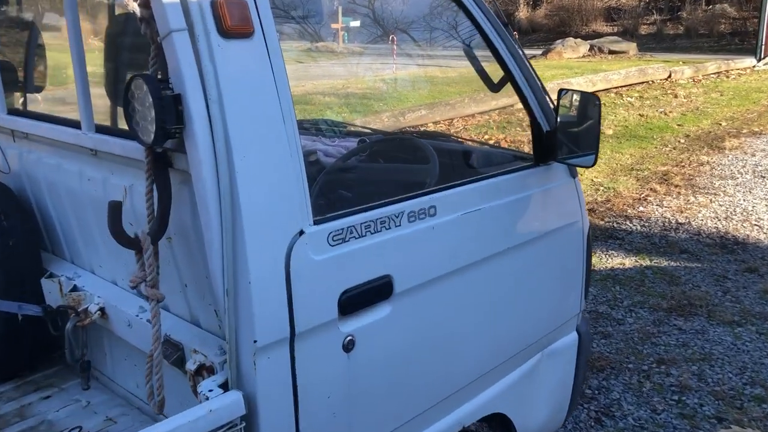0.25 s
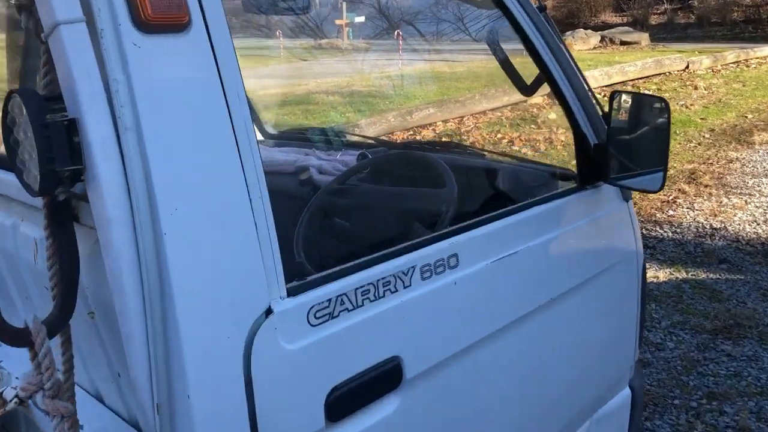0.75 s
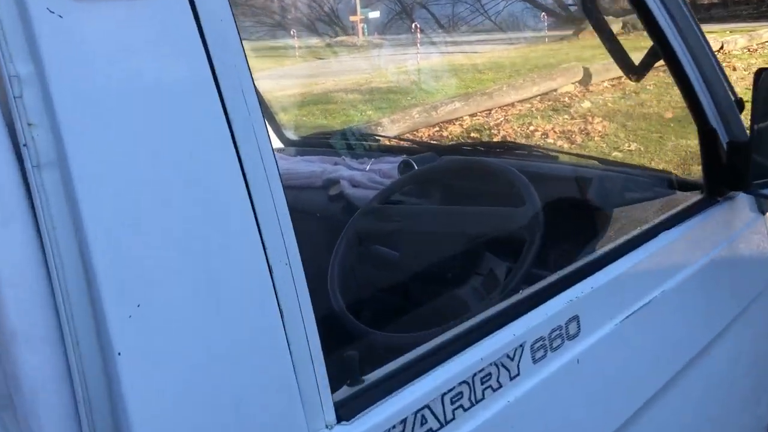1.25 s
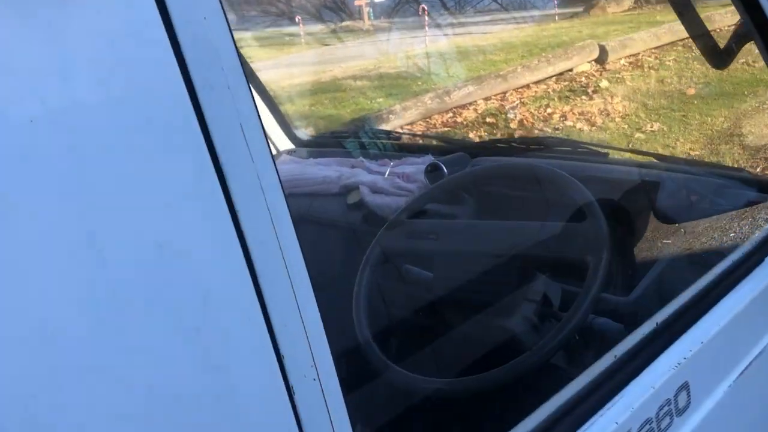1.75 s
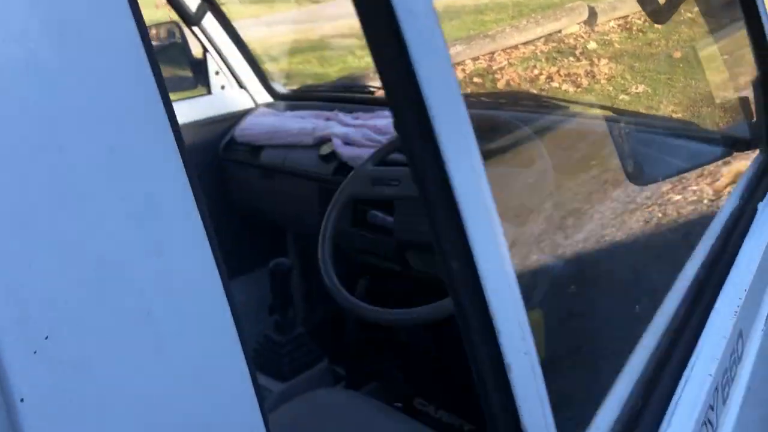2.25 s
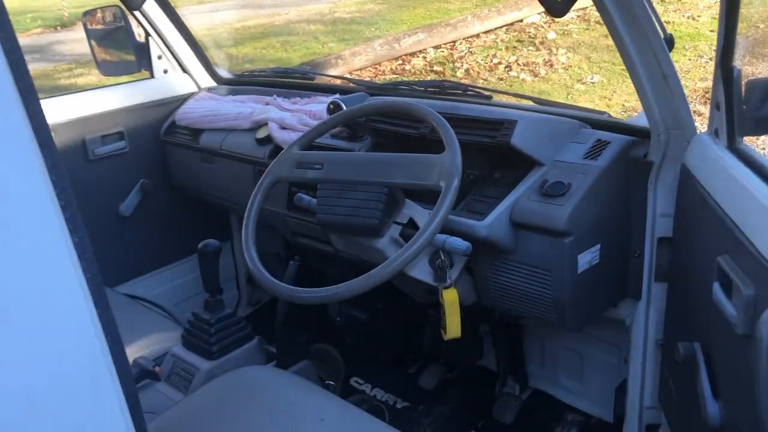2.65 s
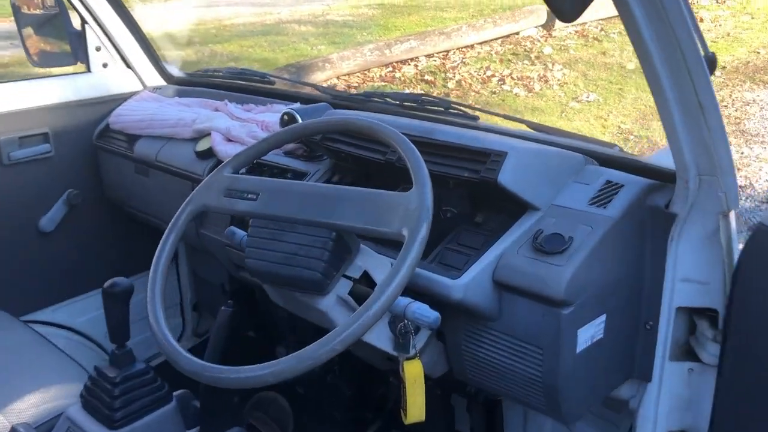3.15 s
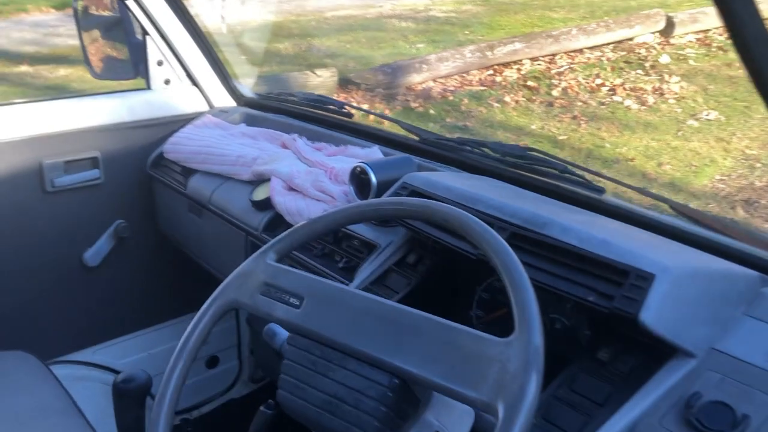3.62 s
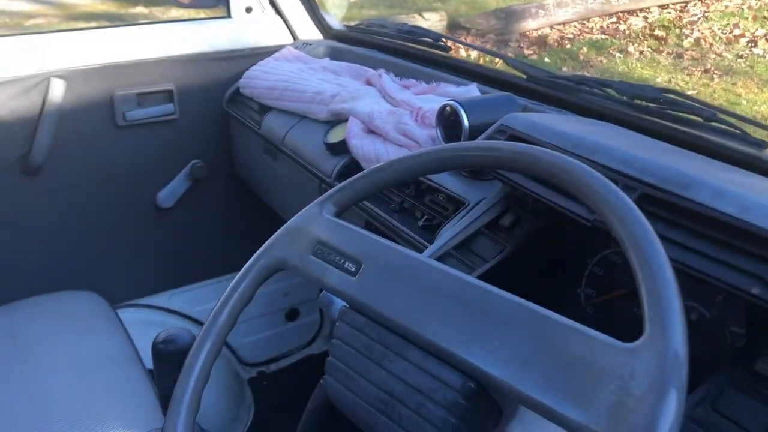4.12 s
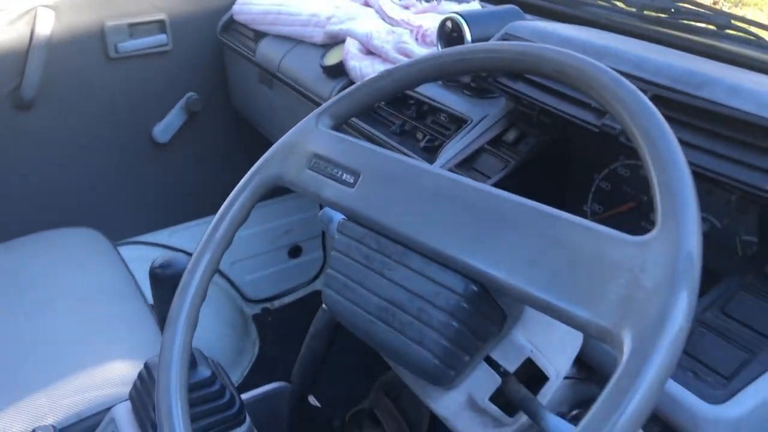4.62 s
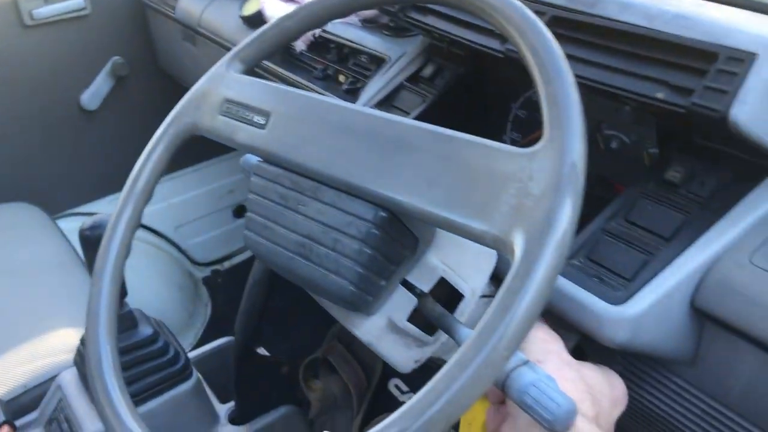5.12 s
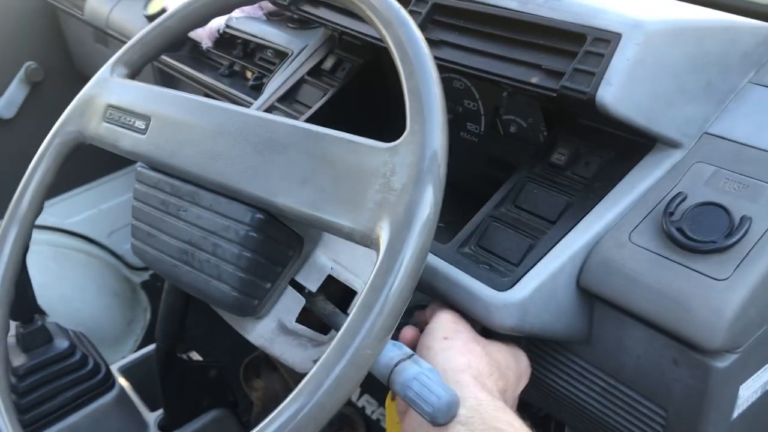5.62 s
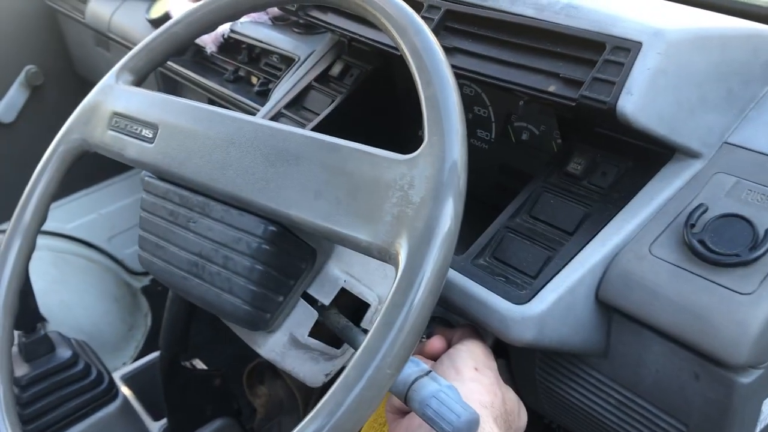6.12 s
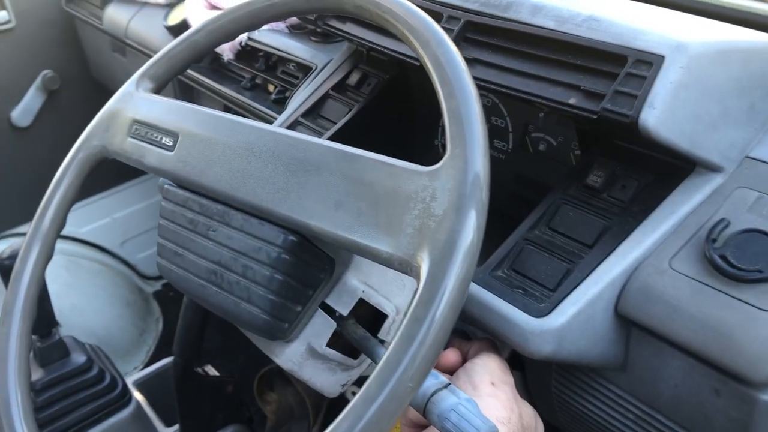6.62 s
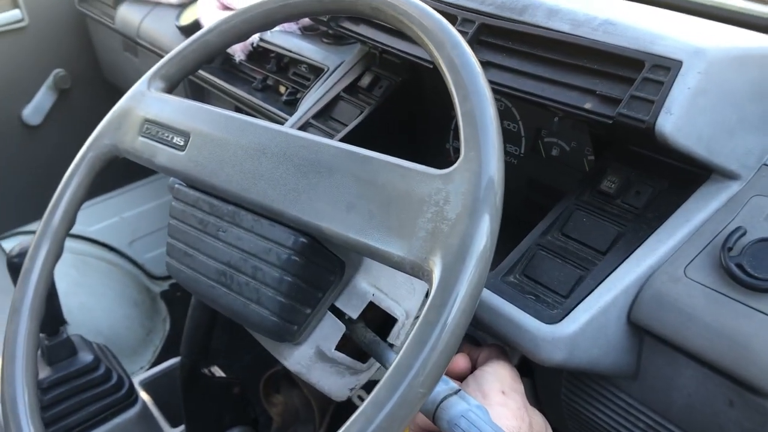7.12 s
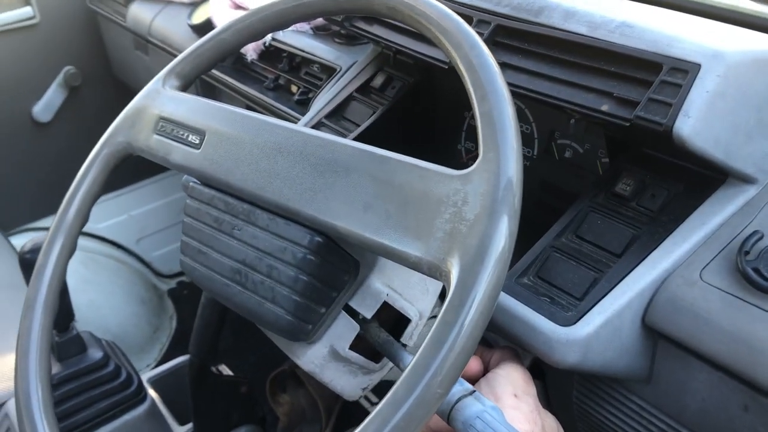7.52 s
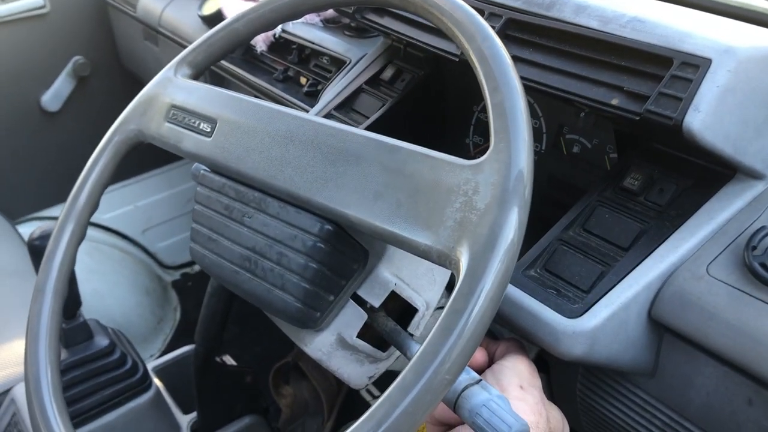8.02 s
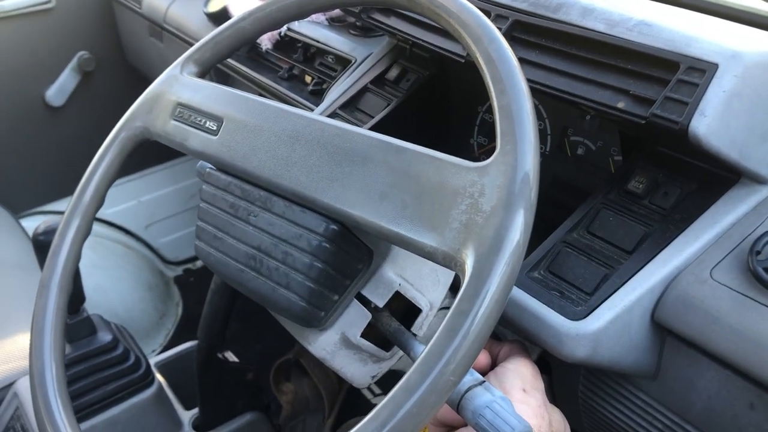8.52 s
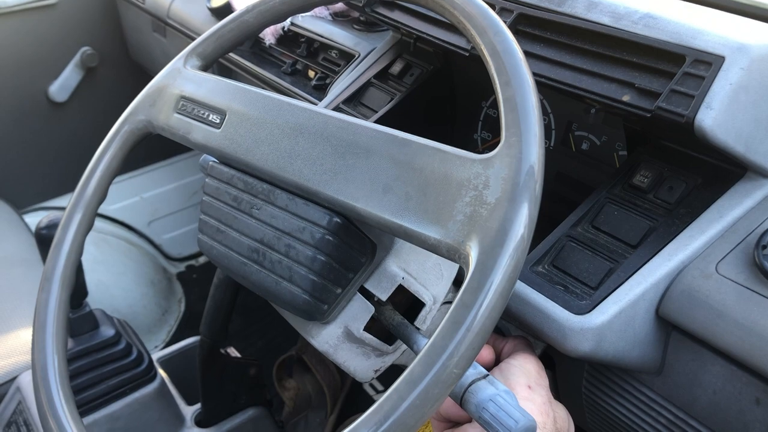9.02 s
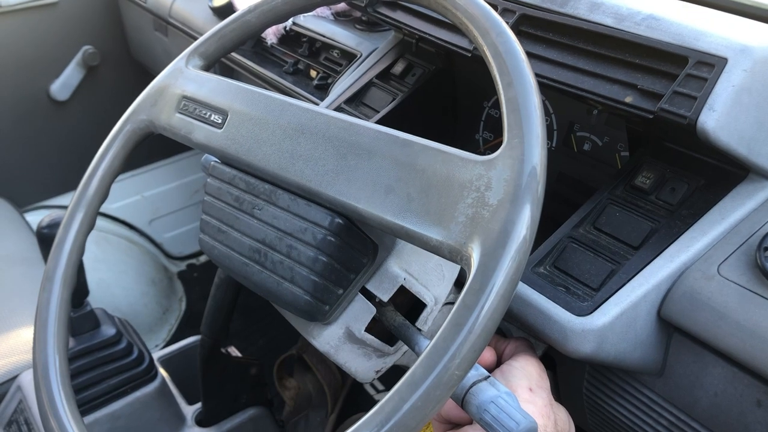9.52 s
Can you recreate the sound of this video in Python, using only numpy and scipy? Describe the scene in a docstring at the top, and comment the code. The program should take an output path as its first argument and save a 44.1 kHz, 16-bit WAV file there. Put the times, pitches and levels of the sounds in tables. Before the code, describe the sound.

Outdoors, shoes crunch over gravel, with a few distant dog barks at first. Close by, a steel truck door pops open loudly, followed by bumps in the cab and the click and clink of keys in the ignition. The starter motor turns the engine over in a quick run of whining, hissing chugs that shake the cab, then drags down to single weak turns without the engine firing.

```python
"""A truck that won't start

Someone crosses gravel to a small truck, pops the latch, swings the door open and leans in to turn the key.
The solenoid clacks and the starter drags the engine over its compressions, then slows to single laboured
heaves; it never fires. Gear whine, brush hiss and the shuddering block sound through the cab, over a
quiet yard with a far-off dog."""
import sys
import numpy as np
from scipy import signal
from scipy.fft import rfft, irfft
from scipy.io import wavfile
from scipy.ndimage import uniform_filter1d

SR = 44100
rng = np.random.default_rng(int(sys.argv[2]) if len(sys.argv) > 2 else 0)


def materialize(psi):
    """Save the field psi as 16-bit PCM at rate SR to the path in sys.argv[1].

    A 1-D psi becomes a single channel; in a 2-D psi each row is a channel.
    """
    bounded = np.clip(np.atleast_2d(psi).T, -1, 1)
    quanta = np.round(bounded * 32767).astype(np.int16)
    wavfile.write(sys.argv[1], SR, quanta)


N = 430416
T = np.arange(N) / SR
HIT_T = T[:SR // 2]

# shoes landing and rolling on gravel: start_s, crunch_db, length_s, heel_db
FOOTFALLS = [(0.461, -34.5, 0.16, -44), (0.49, -54, .1, -38), (0.508, -55, .1, -43),
             (0.521, -50, 0.12, -35), (0.586, -24, 0.027, -33), (0.662, -58, .07, -41.5),
             (1.052, -40.5, 0.14, -74), (1.098, -38.5, 0.52, -44.5), (1.157, -51, 0.071, -44),
             (1.196, -50, 0.067, -44), (1.245, -35, 0.083, -33.5), (1.43, -42.5, 0.061, -57),
             (1.591, -33, 0.31, -46), (1.604, -25.5, 0.081, -34.5), (1.636, -40, 0.062, -37.5),
             (1.761, -31.5, .03, -55), (1.782, -48, 0.073, -47), (1.822, -28, 0.091, -48),
             (2.282, -74, 0.057, -36.5), (3.071, -34, 0.49, -45), (3.23, -34.5, 0.1, -53),
             (3.533, -36, 0.11, -45.5), (3.559, -27.5, 0.16, -37), (3.632, -25.5, 0.11, -32.5),
             (3.76, -36.5, 0.35, -43), (3.88, -35, 0.33, -53), (4.066, -42.5, 0.51, -55)]
# modes of the cab trim: pitch_hz, level_db, t60_s
TRIM_MODES = [(575, 15.5, 0.19), (630, 11.5, 0.83), (689, -18, 0.28), (1134, -35, 0.19), (1680, 11, 0.12),
              (2121, -36, 0.2), (2277, -52, 0.11)]
# starter surges, one per compression plus a weak straining creep between the last two heaves:
# top_speed_s, mesh_hz, length_s, hiss_db, grind_db, shudder_db
SURGES = [(5.885, 372, 0.19, -53.5, -44, -34.5), (6.155, 406, 0.23, -45, -41, -38.5),
          (6.364, 406, 0.19, -44.5, -41.5, -38), (6.565, 409, .2, -44.5, -41.5, -39),
          (6.773, 407, 0.21, -45, -42, -37), (6.98, 378, 0.22, -46, -42, -41),
          (7.267, 345, .23, -47, -44, -40.5), (8.241, 275, 0.29, -49.5, -45.5, -39.5),
          (8.742, 139.5, 0.38, -78.5, -65.5, -42.5), (9.01, 284, .27, -49, -45.5, -38.5)]


def undb(db):
    return 10 ** (np.asarray(db) / 20)


def unit(x):
    return x / np.sqrt(np.mean(x ** 2))


def crest(x):
    """Scale so that the loudest 5 ms have rms 1."""
    return x / np.sqrt(uniform_filter1d(x ** 2, SR // 200).max())


def add(out, start_s, x):
    i = int(start_s * SR)
    out[i:i + len(x)] += x[:N - i]


def envelope(rows, steep=3):
    """Joint gain of swells (peak_s, level_db, rise_s, fall_s), each halved one rise or fall away."""
    swells = [undb(db) / (1 + np.abs((T - s) / np.where(T < s, rise, fall)) ** steep)
              for s, db, rise, fall in rows]
    return np.sqrt(sum(swell ** 2 for swell in swells))


def colour(x, outline, resonances=()):
    """EQ by a (freq_hz, level_db) outline with steep ends, lifted at each resonance; rms 1."""
    f = np.fft.rfftfreq(len(x), 1 / SR) + 1
    hz, db = np.transpose(outline)
    octaves_outside = np.maximum(np.log2(hz[0] / f), 0) + np.maximum(np.log2(f / hz[-1]), 0)
    gain = undb(np.interp(np.log(f), np.log(hz), db) - 20 * octaves_outside)
    for centre, width, lift_db in resonances:
        gain = gain * undb(lift_db / (1 + (2 * (f - centre) / width) ** 2))
    return unit(irfft(rfft(x) * gain, len(x)))


def noise(outline, resonances=(), n=N):
    return colour(rng.standard_normal(n), outline, resonances)


def wander(rate_hz):
    """Smooth random drift with rms 1."""
    hold = int(SR / rate_hz)
    stairs = np.repeat(rng.standard_normal(N // hold + 1), hold)
    return unit(uniform_filter1d(stairs, hold)[:N])


def fade(t60):
    return np.exp(-np.log(1000) * HIT_T / max(t60, .004))


def ring(modes):
    """Free decay of (pitch_hz, level_db, t60_s) modes."""
    return sum(undb(db) * fade(t60) * np.sin(2 * np.pi * hz * HIT_T) for hz, db, t60 in modes)


def scatter(x, t60, wet_db):
    """Add dense reflections off nearby surfaces."""
    tail = rng.standard_normal(len(HIT_T)) * fade(t60)
    return x + undb(wet_db) * signal.fftconvolve(x, tail / np.linalg.norm(tail))[:N]


def blows(hits, body_eq, body_db, thud_db, tick_db, thud_t60, tick_t60,
          modes=(), ring_db=0, top_db=0, contact_s=.004):
    """Bright contact ticks, panel clatter and slower low thuds; the dB settings trim each hit's levels."""
    thud_eq = [(80, -21.5), (130, -4.5), (220, -2), (380, -.5), (600, -5)]
    tick_eq = [(2200, -5.5), (3500, 2), (6000, -1), (11000, top_db / 2 - 4), (15500, top_db - 6)]
    out, n = np.zeros(N), len(HIT_T)
    for s, hit_body_db, hit_thud_db, hit_tick_db, t60, hz in hits:
        attack = 1 - fade(contact_s)
        clatter = crest(noise(body_eq, [(hz, hz / 8, 7)], n) * fade(t60)) + .5 * ring([(hz, 0, t60)])
        if modes:
            clatter += undb(ring_db) * crest(ring(modes) * fade(4 * t60))
        thud = noise(thud_eq, [(197, 54, 5.1)], n) * fade(thud_t60) * (1 - fade(.013))
        tick = noise(tick_eq, n=n) * fade(tick_t60)
        add(out, s, undb(hit_body_db + body_db) * crest(clatter * attack))
        add(out, s, undb(hit_thud_db + thud_db) * crest(thud))
        add(out, s, undb(hit_tick_db + tick_db) * crest(tick * attack))
    return out


def yard(outdoor_db=-57.5, cab_db=-62):
    """Open-air rumble gives way to the duller air of the cab."""
    # the air in the yard, and screened by the cab: freq_hz, level_db
    outdoor_eq = [(15, -34), (25, 8), (84, 5), (217, -7), (326, -8.5), (624, -9), (754, -8.5), (962, -9),
                  (1100, -9), (1520, -11), (1700, -14.5), (2480, -22.5), (4030, -27.5), (16000, -36.5)]
    cab_eq = [(15, -38), (25, 1.5), (53, 2), (87, -5), (200, -11), (270, -19.5), (335, -13.5), (439, -31),
              (503, -23.5), (1940, -30.5), (2410, -35), (16000, -43.5)]
    inside = np.interp(T, [3.4, 5], [0, 1])
    air = (1 - inside) * undb(outdoor_db) * noise(outdoor_eq) + inside * undb(cab_db) * noise(cab_eq)
    return air * undb(.32 * wander(1.6))


def dog():
    """Hoarse, distant yelps rise and fall in pitch, blurred by the trees."""
    # far-off barks: start_s, length_s, pitch_hz, level_db
    barks = [(0.021, 0.09, 754, -57.5), (0.282, 0.12, 755, -63.5), (0.47, 0.11, 766, -55),
             (0.734, 0.126, 765, -66), (0.902, 0.14, 775, -61)]
    out, n = np.zeros(N), len(HIT_T)
    for s, length, hz, db in barks:
        arch = np.sin(np.pi * np.minimum(HIT_T / length, 1))
        pitch = hz * (1 + .08 * (arch - 1) - .33 * fade(1.8 * length) + .022 * wander(200)[:n])
        phase = 2 * np.pi * np.cumsum(pitch) / SR
        voice = .7 * np.sin(phase) + np.sin(2 * phase) + .15 * np.sin(3 * phase)
        rasp = 1 + .45 * (1 + 3 * fade(2 * length)) * wander(350)[:n]
        add(out, s, undb(db) * arch * rasp * voice)
    return scatter(out, t60=.39, wet_db=-.5)


def gravel(count=18000, spread_db=2.5, ring_cycles=2.6, attack_s=.014):
    """Each crunch releases a shower of stone clicks, every one with its own pitch and size."""
    stone_eq = [(600, 8.5), (1500, 4), (3000, -5.5), (6000, -5), (10000, -1), (15500, -2.5)]
    pressure, stones = np.zeros((2, N))
    for s, db, length, _ in FOOTFALLS:
        add(pressure, s, undb(db) * fade(2 * length) * (1 - fade(attack_s)))
    when, pitch_rank, size_rank = rng.random((count, 3)).T
    hz = 700 * (15000 / 700) ** (pitch_rank ** .6)
    size = undb(spread_db * np.minimum(-np.log(1 - size_rank), 4)) * np.sqrt(hz)
    cycles = hz[:, None] * HIT_T[:SR // 150]
    clicks = size[:, None] * np.exp(-cycles / ring_cycles) * np.sin(2 * np.pi * cycles)
    for s, click in zip(when * T[-1] / 2, clicks):
        add(stones, s, click)
    slips = undb(2.5 * wander(90))  # the stones give way unevenly
    return undb(-17.5) * colour(stones, stone_eq) * pressure * slips


def heels(pitch_hz=719.6, t60=.125):
    """Every heel lands with the same short knock, and a tick that follows its crunch in level."""
    hits = [(s, db, db, crunch_db, t60, pitch_hz) for s, crunch_db, _, db in FOOTFALLS]
    return blows(hits, [(300, 6), (750, -1.5), (1200, -2.5), (2400, -22)], body_db=-8.5, thud_db=-16,
                 tick_db=-21.5, thud_t60=.3, tick_t60=.028, top_db=20, contact_s=.0099)


def cab_knocks(rap_t60=.013):
    """The cab knocks and creaks as the driver leans in; each knock opens with a short rap."""
    # bumps against the cab: start_s, body_db, tick_db, t60_s, pitch_hz
    knocks = [(1.788, -30.5, -48.5, 0.11, 1990), (2.309, -35, -59.5, 0.034, 500),
              (2.466, -35, -55, 0.071, 1040), (3.039, -42, -66, .04, 1380), (3.115, -32.5, -45, .1, 990),
              (3.137, -34, -49, 0.16, 1020), (3.189, -30, -55, 0.29, 1316), (3.229, -29, -58, 0.066, 1500),
              (3.29, -41, -52, 0.34, 930), (3.313, -38, -66, 0.082, 980), (3.342, -22.5, -69, 0.082, 990),
              (3.357, -34.5, -67, 0.084, 720), (3.563, -34, -40, 0.12, 630),
              (3.607, -23.5, -39.5, 0.16, 995), (3.667, -34, -46, 0.056, 1380),
              (3.772, -31, -42, 0.12, 577), (3.885, -35, -38, 0.35, 617), (3.962, -30.5, -42, 0.073, 1930),
              (4.008, -35.5, -48, 0.21, 1427), (4.047, -36, -49, 0.11, 624),
              (4.095, -30.5, -52, 0.06, 1080), (4.157, -35, -67, 0.14, 1416),
              (4.233, -32.5, -52, 0.12, 1415), (4.588, -33, -42, 0.14, 1570)]
    body_eq = [(400, -7), (620, 7.5), (900, 5.5), (1350, 6.5), (2000, 0), (3000, -15.5)]
    hits = [(s, db, db, tick_db, t60, hz) for s, db, tick_db, t60, hz in knocks]
    out = blows(hits, body_eq, body_db=-9.5, thud_db=-23, tick_db=-5.5, thud_t60=.4, tick_t60=.13,
                modes=TRIM_MODES, ring_db=-11, top_db=-1)
    for s, db, _, _, hz in knocks:
        rap = ring([(hz, -6, rap_t60), (.51 * hz, -13, rap_t60), (1.58 * hz, -9, rap_t60 / 2)])
        add(out, s, undb(db) * rap)
    return out


def cab_rumble():
    """Low swells of cab rumble as the driver moves and as the starter engages."""
    # swells of rumble: peak_s, level_db, rise_s, fall_s
    swells = [(2.85, -47.5, .07, 0.15), (3.82, -54, 0.2, 0.2), (4.68, -54, 0.15, 0.1),
              (5.35, -62, .3, 0.11), (5.87, -43, 0.037, .07)]
    return noise([(35, -9), (60, 5.5), (95, -2.5), (135, 6.5), (220, -5), (400, -11.5)]) * envelope(swells)


def sleeve():
    """A sleeve rustles against the dash."""
    # passes of the arm: peak_s, level_db, rise_s, fall_s
    rustles = [(4.88, -63, 0.39, 0.057), (5.2, -63.5, 0.17, 0.26)]
    # rubbing cloth: freq_hz, level_db
    cloth_eq = [(240, -43), (400, -4), (579, -0.5), (1580, -4.5), (2670, -12), (3260, -12.5),
                (16000, -18.5)]
    return noise(cloth_eq) * undb(2.5 * wander(45)) * envelope(rustles)


def door():
    """The pawl snaps, the steel door rings, and its panel booms as it swings."""
    # springing free, then over the check strap: start_s, body_db, thud_db, tick_db, t60_s, pitch_hz
    jolts = [(1.903, -10.5, -25, -34, 0.063, 1930), (1.916, -13, -32.5, -62, 0.15, 624),
             (1.938, -31.5, -49, -50.5, 0.05, 1750), (2.628, -34, -54, -45, 0.32, 1615),
             (2.644, -28.5, -40, -30.5, 0.28, 1526), (2.666, -26, -48, -43, 0.1, 2060)]
    # snaps of the latch pawl: start_s, level_db
    snaps = [(1.896, -15), (1.903, -3)]
    # modes of the door, and of the latch on its skin: pitch_hz, level_db, t60_s
    door_modes = [(525.5, -3, 0.13), (624, -10.5, 0.12), (777, -8.5, 0.4), (1060, -9.5, 0.17),
                  (947, -7, 0.17), (1250, -10, 0.26), (1486, -22, 0.23), (1516, -4, 0.17),
                  (1930, -14.5, 0.36), (2191, -4.5, 0.17), (2384, 4, 0.056), (2494, 0, 0.13),
                  (2615, -12.5, 0.1), (2700, -7, 0.065)]
    pawl_modes = [(132, -18.5, 0.19), (1570, -6, 0.032), (1750, 4, 0.058), (1930, 10, 0.03),
                  (2394, -3.5, 0.012)]
    # the panel tugged, freed and checked: peak_s, level_db, rise_s, fall_s
    booms = [(1.81, -43, 0.037, 0.18), (1.96, -45.5, 0.053, 0.13), (2.67, -40, 0.017, 0.09)]
    body_eq = [(350, -10.5), (650, 0), (1200, -1), (1900, .5), (2600, -13), (3100, -16.5), (4500, -22)]
    panel_eq = [(60, -13.5), (140, -10), (210, -4), (330, -7), (700, -14), (1800, -29.5)]
    out = blows(jolts, body_eq, body_db=-8.5, thud_db=-2, tick_db=-1.5, thud_t60=.17, tick_t60=.12,
                modes=door_modes, ring_db=-3.5, top_db=-6.5, contact_s=.0047)
    pawl = ring(pawl_modes)
    for s, db in snaps:
        add(out, s, undb(db - .5) * pawl / np.abs(pawl).max())
    return out + noise(panel_eq, [(199, 20, 14), (160, 13, 6.3)]) * envelope(booms)


def ignition_key():
    """The key rattles in its lock while the hanging keys clink."""
    # clicks of the lock: start_s, body_db, thud_db, tick_db, t60_s, pitch_hz
    clicks = [(4.444, -48, -53, -55, 0.069, 600), (4.477, -32, -40, -28.5, 0.084, 1326),
              (4.627, -21.5, -40.5, -31.5, 0.081, 1076), (4.835, -44, -50, -43, 0.14, 560),
              (4.905, -45, -74, -61, 0.082, 630), (5.706, -45, -54.5, -57, 0.13, 606.7)]
    # keys touching: start_s, level_db
    clinks = [(4.146, -63), (4.228, -54), (4.444, -57), (4.63, -48)]
    # modes of the keys: pitch_hz, level_db, t60_s
    key_modes = [(3220, -1.5, 0.12), (6880, 0, 0.071), (10300, -11, 0.057), (12600, 2, 0.052),
                 (14600, -3, .07)]
    body_eq = [(350, -21), (700, -11.5), (1600, -18), (2800, -19)]
    out = blows(clicks, body_eq, body_db=-11, thud_db=-11.5, tick_db=-5, thud_t60=.22, tick_t60=.097,
                modes=TRIM_MODES, ring_db=-11.5, top_db=3.5, contact_s=.013)
    for s, db in clinks:
        add(out, s, undb(db) * ring(key_modes))
    return out


def solenoid():
    """The solenoid throws the pinion into the flywheel; at the last clack it drops back ringing."""
    # solenoid and pinion hits: start_s, body_db, thud_db, tick_db, t60_s, pitch_hz
    clacks = [(5.739, -36, -40, -64, 0.21, 1030), (5.797, -24.5, -53, -37.5, 0.12, 1610),
              (5.816, -27, -35, -36.5, 0.61, 724), (8.535, -35.5, -46.5, -50, 0.14, 681)]
    # modes of the freed drive: pitch_hz, level_db, t60_s
    drive_modes = [(405, -46, 0.49), (766, -47.5, 0.15), (1930, -48, 0.1), (5100, -58, 0.27),
                   (5200, -59, 0.25), (6240, -59, 0.22)]
    body_eq = [(350, 7.5), (800, -7), (1700, 3), (2600, -5), (4300, -16)]
    out = blows(clacks, body_eq, body_db=-11.5, thud_db=-4, tick_db=1, thud_t60=.31, tick_t60=.12,
                contact_s=.0049)
    add(out, clacks[-1][0], ring(drive_modes) * (1 - fade(.03)))
    return out


def engine_block(shake, rumble):
    """The block shudders on its mounts and sets the cab humming at its modes."""
    # the block's shudder: freq_hz, level_db
    block_eq = [(30, -29), (55, -3.5), (85, -7), (130, 0), (300, 2.5), (430, -3.5), (560, -10),
                (1000, -30.5)]
    # modes of the cab: pitch_hz, rumble_db, shake_db
    cab_modes = [(133.5, -5.5, -11), (159.4, -10.5, -13), (222.6, -6.5, -0.5), (314, -10, -10.5),
                 (436, -12, -9.5)]
    out = noise(block_eq) * np.hypot(undb(-4) * shake, undb(-5.5) * rumble)
    for hz, rumble_db, shake_db in cab_modes:
        phase = 2 * np.pi * np.cumsum(hz * (1 + .014 * wander(40))) / SR
        hum = undb(2.5 * wander(25)) * np.sin(phase)
        out += hum * np.hypot(undb(rumble_db) * rumble, undb(shake_db) * shake)
    return out


def mesh_rate(creep_hz=99.6, spin_up_s=.122, brake_s=.15):
    """The motor creeps when stalled, spins up once a piston is over the top, and is braked by the next."""
    humps = [(hz - creep_hz) * np.exp(-((T - s) / np.where(T < s, spin_up_s, brake_s)) ** 2)
             for s, hz, *_ in SURGES]
    return creep_hz + np.max(humps, axis=0)


def surge_levels(power_on_s=5.797):
    """In each surge brushes hiss at top speed, teeth bite as the piston resists, then the block shakes."""
    # the solenoid's clack, then the pinion grating into or out of the flywheel: peak_s, length_s, hiss_db,
    # grind_db
    grates = [(5.745, 0.027, -57.5, -56), (5.827, 0.012, -43, -26), (8.549, 0.0062, -52, -59)]
    hiss, grind, bite, shake, rumble = [], [], [], [], []
    for s, _, length, hiss_db, grind_db, shudder_db in SURGES:
        hiss.append((s, hiss_db, .26 * length, .4 * length))
        grind.append((s, grind_db - .5, .45 * length, .49 * length))
        bite.append((s + .31 * length, grind_db + 2.5, .11 * length, .16 * length))
        shake.append((s + .49 * length, shudder_db + .35, .14 * length, .19 * length))
        rumble.append((s, (grind_db + shudder_db) / 2 - 3, .5 * length, 1.08 * length))
    powered = np.clip((T - power_on_s) / .013, 0, 1)
    grate_hiss = envelope([(s, db, length, length) for s, length, db, _ in grates], steep=2.4)
    grate_bite = envelope([(s, db, length, length) for s, length, _, db in grates], steep=2.4)
    return (np.hypot(powered * envelope(hiss, steep=3.64), grate_hiss),
            powered * envelope(grind, steep=4.6),
            np.hypot(powered * envelope(bite, steep=2.1), grate_bite),
            powered * envelope(shake, steep=1.8),
            powered * envelope(rumble, steep=2.7))


def gear_partials(teeth):
    """Tooth-mesh harmonics with weaker sidebands at each third; backlash makes every partial waver."""
    out = np.zeros(N)
    for thirds in range(3, 42):
        weight = 1 if thirds % 3 == 0 else .25
        waver = undb(2.5 * wander(35))
        out += weight * waver * np.sin(2 * np.pi * (thirds * teeth / 3 + rng.random()))
    return unit(out)


def starter(chatter=.2, flutter=.005, casing_hz=815, casing_width_hz=26):
    """Pinion teeth grind on the ring gear, brushes scrape the commutator, compressions shake the block."""
    # tone of the gears, the chug of biting teeth and the brush hiss: freq_hz, level_db
    gear_eq = [(250, -21.5), (400, 7.5), (600, -4), (820, 3.5), (950, 2.5), (1200, 3), (1600, -0.5),
               (2100, -8.5), (3500, -20.5), (7000, -63.5)]
    chug_eq = [(300, -8), (450, 1), (650, 0), (900, 2.5), (1600, 0.5), (1900, -7), (2200, -17.5),
               (7000, -43)]
    brush_eq = [(1120, -62), (1900, 0.5), (2020, -13.5), (2990, -0.5), (3550, -0.5), (3770, -4.5),
                (4350, -2), (5200, -10), (6160, -5), (6860, -7), (10200, -11.5), (15200, -15),
                (16000, -17.5)]
    # resonances of the starter housing: centre_hz, width_hz, lift_db
    housing = [(1059, 26, 6), (1290, 83, 5.5), (1536, 44, 9.5), (1750, 70, 2.5), (2143, 32, 8.5),
               (2386, 55, 7.5), (2750, 46, 1.5), (3060, 26, 8.5), (3430, 41, 6.5), (4025, 33, 8.5),
               (4400, 71, 3.5), (5970, 196, 5)]
    mesh_hz = mesh_rate()
    hiss, grind, bite, shake, rumble = surge_levels()
    teeth = np.cumsum(mesh_hz * (1 + flutter * wander(70))) / SR
    # the teeth press hardest, and sound clearest, while a compression brakes the starter
    braking = uniform_filter1d(1. * (np.gradient(mesh_hz) < 0), SR // 25)
    partials = gear_partials(teeth) * (.5 + .5 * braking)
    contact = unit(np.exp(3 * (np.cos(2 * np.pi * teeth) - 1)))  # one pulse a tooth
    scrape = unit((1 - chatter + chatter * contact) * rng.standard_normal(N))
    gears = colour(partials, gear_eq, housing) + undb(-7) * colour(scrape, gear_eq, housing)
    gears = unit(scatter(gears, t60=.07, wet_db=-8))
    # under the heaviest load the teeth knock in rough, uneven bursts
    chug = colour(contact * undb(3 * wander(120)) * rng.standard_normal(N), chug_eq, housing)
    brushes = colour(scatter(scrape + .55 * partials, t60=.06, wet_db=-5), brush_eq, housing)
    # twice the mesh rate sings when it meets the casing's mode
    whine = np.sin(4 * np.pi * teeth) / (1 + ((2 * mesh_hz - casing_hz) / casing_width_hz) ** 2)
    # the mesh rate itself groans unevenly under load
    groan = braking * undb(4 * wander(30)) * np.sin(2 * np.pi * teeth)
    drive = (gears + undb(1) * whine + undb(-4) * groan) * grind
    return drive + undb(-2.5) * chug * bite + undb(.5) * brushes * hiss + engine_block(shake, rumble)


def scene():
    movement = gravel() + heels() + cab_knocks() + cab_rumble() + sleeve()
    truck = door() + ignition_key() + solenoid() + starter()
    return (yard() + dog() + movement + truck)[None]


def record(dry, low_cut_hz=40, high_cut_hz=16100):
    """Roll off the deepest rumble and cut the very top."""
    dry = signal.sosfilt(signal.butter(4, low_cut_hz, "highpass", fs=SR, output="sos"), dry)
    return signal.sosfilt(signal.ellip(10, .2, 70, high_cut_hz, fs=SR, output="sos"), dry)


dry = scene()
out = record(dry)
materialize(out)
```